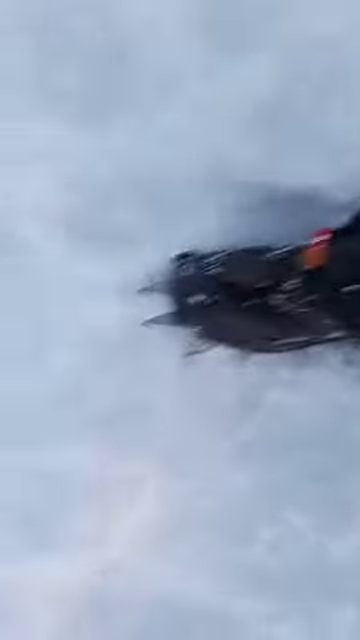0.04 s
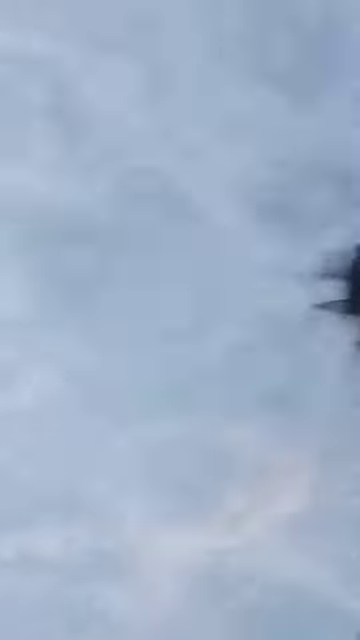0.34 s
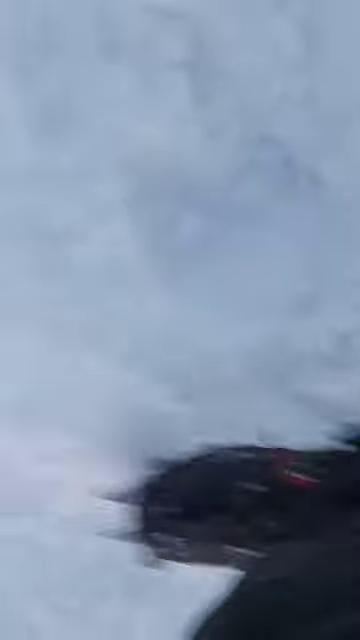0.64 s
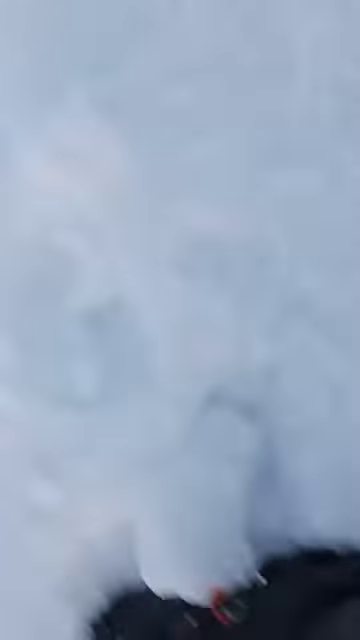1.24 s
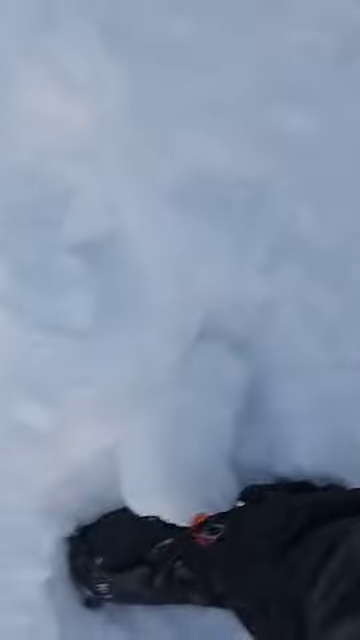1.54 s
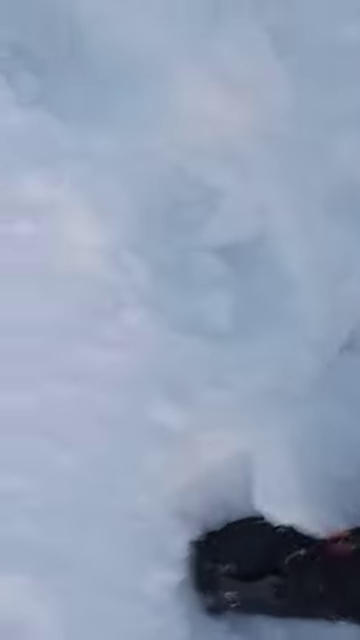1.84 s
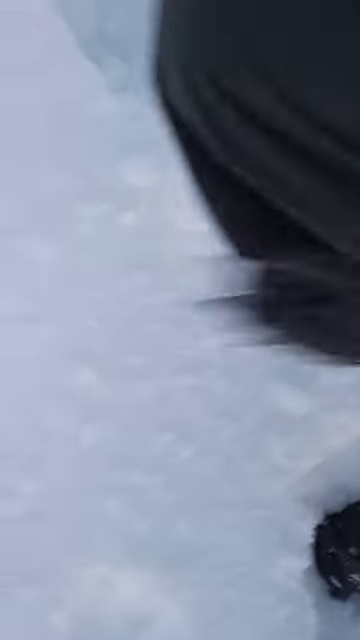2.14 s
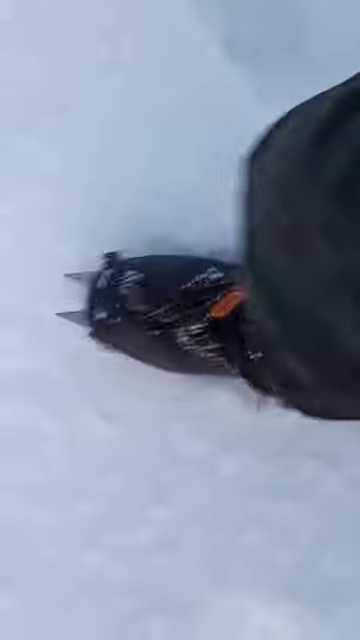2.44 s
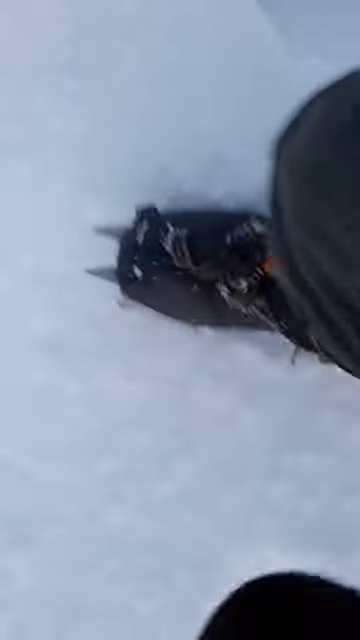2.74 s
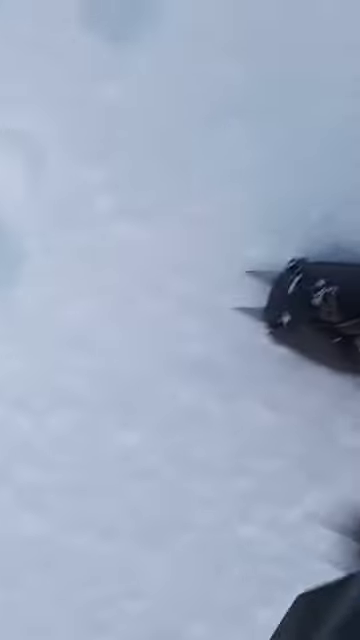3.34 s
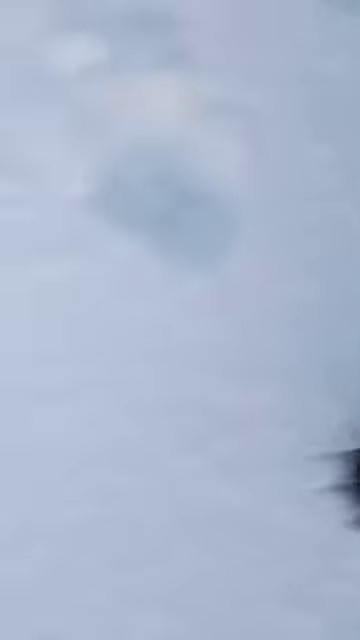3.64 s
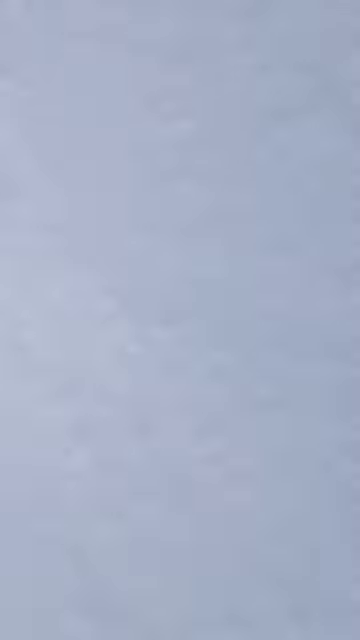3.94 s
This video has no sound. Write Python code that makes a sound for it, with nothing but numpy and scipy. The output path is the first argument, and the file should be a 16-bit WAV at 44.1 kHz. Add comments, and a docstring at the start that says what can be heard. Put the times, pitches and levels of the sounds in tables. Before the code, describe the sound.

Crampon boots crunch across hard snow as wind buffets the microphone.

```python
"""Crampon steps on hard, crusted snow, heard from above the boots, with no echo.
Spikes crack the crust and ring the steel frame; the sole packs the snow, which gives in jerks
that shake the boot. Ice chips tick on the steel; points and trouser legs brush between steps.
Gusts buffet each of two microphone ports separately, over an air hush with one faint whistle."""
import sys
import numpy as np
from scipy import signal
from scipy.fft import rfft, irfft
from scipy.io import wavfile
from scipy.ndimage import uniform_filter1d

SR = 44100
rng = np.random.default_rng(int(sys.argv[2]) if len(sys.argv) > 2 else 0)


def to_wav(s):
    """Save 16-bit WAV."""
    ch = np.atleast_2d(s).T  # columns
    pcm = np.round(np.clip(ch, -1, 1) * 32767)  # PCM
    wavfile.write(sys.argv[1], SR, pcm.astype(np.int16))


N = 176400
TIME_S = np.arange(N) / SR
FREQ_HZ = np.maximum(np.arange(N // 2 + 1) * SR / N, 1)
STEP_LEFT_DB = 0.5  # boots land slightly left

# Snow giving way (time [s], hold [s], crust gain [dB], packing gain [dB])
CRUNCHES = [(0.939, 0.039, -34, -38), (0.996, 0.0096, -39, -24), (1.019, 0.018, -39.5, -32.5),
            (2.362, 0.0089, -25.5, -37), (2.377, 0.012, -29, -22), (2.392, 0.0068, -24, -23),
            (2.458, 0.012, -40, -41.5), (2.479, 0.086, -47.5, -45), (2.525, 0.025, -44.5, -38),
            (2.582, 0.011, -37.5, -30.5), (3.023, 0.066, -49, -39.5), (3.563, 0.0064, -25, -24.5),
            (3.576, 0.024, -30.5, -24), (3.607, 0.034, -42, -41), (3.647, 0.029, -39, -32.5),
            (3.698, 0.021, -41, -36.5)]
# Cracking crust (frequency [Hz], relative density [dB])
CRUST_SPECTRUM = [(500, -4), (1500, -3.5), (2600, -7), (3500, -8), (4500, -3.5), (6000, -2.5), (7500, -1),
                  (10300, 2), (11800, -7), (15500, -12.5)]
# Packing snow (frequency [Hz], relative density [dB])
PACK_SPECTRUM = [(70, -21), (200, 7.5), (480, 0.5), (700, -8), (1170, -7), (1900, -20), (3500, -27),
                 (8000, -48)]
# Crampon frame (frequency [Hz], gain [dB])
STEEL_MODES = [(5466, -6), (6350, -8), (7222, -1), (7820, 11), (8541, 7), (9413, -12), (10323, -20)]
# Stiff boot at pitch factor 1 (frequency [Hz], gain [dB], T60 [s])
BOOT_MODES = [(481, 3, 0.017), (745, 1, 0.011), (894, 0, 0.011), (1050, -4.5, 0.015), (1325, -4, 0.016),
              (1480, -6.5, 0.011)]
# Sole jolts (time [s], level [dB], pitch factor [ratio])
KNOCKS = [(0.996, -25.5, 1.35), (1.017, -34, 1.6), (1.177, -35.5, 1.6), (1.249, -31.5, 1.6),
          (2.3913, -10.5, 1.03), (3.0432, -31, 1), (3.577, -29, 0.98), (3.588, -23.5, 1),
          (3.611, -30, 1.03), (3.652, -27, 1.25)]
# Ice chips on steel (time [s], level [dB])
TICKS = [(0.06, -32), (0.071, -30.5), (.694, -28.5), (1.125, -30), (1.536, -37), (1.644, -40.5),
         (1.846, -45), (2.539, -32), (2.591, -28.5), (2.861, -34.5), (3.043, -41), (3.0721, -19)]
# Chip snap (frequency [Hz], relative density [dB])
TICK_SPECTRUM = [(1200, -8), (4000, -3.5), (9500, 6.5), (13000, -6.5)]
# Trouser legs and loose snow (time [s], gain [dB])
SWISH_CURVE = [(0, -51), (.22, -52), (.42, -68), (.61, -66), (.63, -48), (.80, -47), (.925, -52.5),
               (.95, -35), (1.25, -42), (1.35, -53.5), (1.5, -60), (1.92, -58.5), (2.08, -69),
               (2.35, -57.5), (2.48, -43), (2.63, -64), (2.77, -58), (3.07, -46), (3.16, -52.5),
               (3.33, -73), (3.48, -52.5), (3.55, -67.5), (3.85, -51.5), (4, -54.5)]
# Leg swish (frequency [Hz], relative density [dB])
SWISH_SPECTRUM = [(150, 16.5), (500, 8.5), (1100, -1), (1800, 0), (2800, -4), (4200, -1.5), (7000, -1.5),
                  (10200, 0), (12000, -6.5), (15500, -13)]
# Points and gaiters on snow (time [s], hold [s], gain [dB])
SCUFFS = [(.001, 0.015, -37.5), (0.067, 0.05, -43.5), (0.356, 0.021, -43.5), (0.464, 0.023, -47),
          (0.621, 0.021, -43.5), (0.753, 0.017, -46), (0.903, 0.0044, -41.5), (1.538, 0.1, -54),
          (1.73, 0.015, -58), (2.195, 0.019, -56), (2.229, 0.01, -49), (3.452, 0.0064, -44.5)]
# Gusts on each port (time [s], gain [dB])
GUSTS_LEFT = [(0.0, -10), (0.04, -11.5), (0.08, -39.5), (0.15, -16.5), (0.45, -15), (0.52, -37),
              (0.55, -21.5), (0.65, -29), (0.7, -16.5), (0.8, -44.5), (1.03, -26), (1.27, -33),
              (1.55, -30.5), (1.625, -15.5), (1.67, -43), (1.85, -41), (1.96, -30), (2.02, -81),
              (2.06, -29), (2.44, -39.5), (2.48, -22.5), (2.51, -51), (2.67, -33.5), (2.83, -51),
              (2.93, -67), (2.95, -26), (2.98, -19.5), (3.01, -28.5), (3.09, -17), (3.18, -38), (3.23, -17),
              (3.32, -35), (3.64, -30), (3.75, -51.5), (3.77, -27.5), (3.86, -23), (4.0, -53.5)]
GUSTS_RIGHT = [(0.0, -24.5), (0.31, -11), (0.6, -32), (0.66, -14), (0.7, -24), (0.91, -18.5), (1.03, -29),
               (1.12, -20), (1.28, -39), (1.35, -23), (1.45, -31.5), (1.63, -40), (1.67, -18), (1.73, -34),
               (1.83, -22.5), (2.03, -47), (2.11, -49), (2.16, -26), (2.27, -37.5), (2.31, -30),
               (2.48, -40.5), (2.67, -32), (2.84, -32.5), (2.88, -65), (2.98, -50), (3.03, -22.5),
               (3.09, -57), (3.12, -24), (3.21, -39), (3.27, -22), (3.37, -53.5), (3.53, -45), (3.56, -31),
               (3.76, -68), (3.94, -37.5), (4.0, -63)]
# Rumble of a moderate gust (frequency [Hz], relative density [dB])
WIND_SPECTRUM = [(25, -30), (45, -21), (75, -1.5), (105, 1.5), (200, -6), (330, -16.5), (550, -31),
                 (1000, -56), (2500, -80), (8000, -110)]
# Eddies hitting a port (time [s], peak [dB], pitch [Hz], left minus right [dB])
EDDIES = [(0.152, -5, 288, 14), (.212, -4.5, 274, 32), (.287, -4.5, 190, -23), (.316, -17, 534, -30),
          (.331, -15.5, 420, -32), (0.384, -9, 275, -20), (.77, -11.5, 227, -27), (.866, -13, 222, -26),
          (1.662, -17, 284, -33), (1.81, -23.5, 285, -34)]
# Still air (frequency [Hz], relative density [dB])
AIR_SPECTRUM = [(30, 14), (110, 20), (450, 10.5), (900, 0.5), (2500, -7.5), (7000, -7.5), (15500, -18)]
# Whistle in a lull (time [s], pitch [Hz], level [dB])
WHISTLE_CURVE = [(1.85, 430, -81), (2.04, 490, -62.5), (2.25, 463, -88)]


def steps(crust_db=-2, pack_db=-5.5, body_db=-26, attack_s=0.0059, pack_width=0.52, surge_share=0.27):
    """Crust cracks in jerks that shake the boot, over the duller crunch of packing snow."""
    jerks = slips()
    surge_release_s = 0.0017
    surge = unit_rms(signal.lfilter([1], [1, -np.exp(-1 / (surge_release_s * SR))], jerks))
    crust = crumble(colour(at_ports(grains(per_s=6700, spread_db=0)), CRUST_SPECTRUM))
    crust *= unit_rms(1 - surge_share + surge_share * surge)
    mid = grains(per_s=900, spread_db=4.5)
    side = pack_width * grains(per_s=900, spread_db=4.5)
    pack = colour(np.array([mid + side, mid - side]), PACK_SPECTRUM)
    crust_env, pack_env, body = 0, 0, 0
    for start_s, hold_s, crack_db, load_db in CRUNCHES:
        crust_env += from_db(crust_db + crack_db) * burst(start_s, hold_s, attack_s, release_s=0.0065)
        load = from_db(load_db) * burst(start_s, hold_s, attack_s, release_s=0.0055)
        pack_env += load
        body += boot(jerks * load, pitch=1 + 0.092 * rng.standard_normal())
    crackle = pan(STEP_LEFT_DB) * crust * crust_env
    return crackle + steel(crackle) + from_db(pack_db) * pack * pack_env + from_db(body_db) * body


def slips(per_s=250):
    """Snow collapses in an uneven run of jerks; unit RMS."""
    gaps, sizes = rng.uniform(0.35, 1.65, (2, 3000))
    onsets = (np.cumsum(gaps) * SR / per_s).astype(int)
    clicks = np.zeros(N)
    clicks[onsets[onsets < N]] = sizes[onsets < N]
    return unit_rms(clicks)


def grains(per_s, spread_db):
    """Tiny fractures at random times; unit RMS."""
    sizes = from_db(spread_db * np.minimum(rng.exponential(1, N), 5)) * rng.choice([-1, 1], N)
    return unit_rms(sizes * (rng.random(N) < per_s / SR))


def crumble(stream, depth_db=2.5):
    """Chips of changing size: each third-octave swells and fades on its own; unit RMS."""
    spectrum = rfft(stream)
    thirds = np.clip(3 * np.log2(FREQ_HZ / 500), 0, 14)
    bands = (band(spectrum, thirds, k) * from_db(depth_db * drift(corner_hz=29)) for k in range(15))
    return unit_rms(sum(bands))


def steel(drive, t60_s=0.05, gain_db=-14):
    """The crampon frame rings with what breaks on it."""
    modes = sum(from_db(db) * ring(drive, hz, t60_s) for hz, db in STEEL_MODES)
    decay_norm = np.sqrt(2 * np.log(1000) / (t60_s * SR))
    return from_db(gain_db) * decay_norm * modes / len(STEEL_MODES)


def boot(drive, pitch):
    """Hollow boot modes of alternating sign; higher pitch dies sooner."""
    return sum((-1) ** k * from_db(db) * ring(drive, hz * pitch, t60_s / pitch)
               for k, (hz, db, t60_s) in enumerate(BOOT_MODES))


def knocks():
    """Collapsing snow jolts the sole; each impulse rings the boot."""
    return sum(boot(from_db(db) * (np.arange(N) == int(start_s * SR)), pitch)
               for start_s, db, pitch in KNOCKS)


def ticks():
    """Ice chips snap on the frame and ring it."""
    envelope = sum(from_db(db) * burst(start_s, hold_s=0.00019, attack_s=0.0001, release_s=0.0011)
                   for start_s, db in TICKS)
    snaps = envelope * colour(rng.standard_normal((2, N)), TICK_SPECTRUM) * pan(STEP_LEFT_DB)
    return snaps + steel(snaps)


def swish(gain_db=1):
    """Swinging legs rub cloth and loose snow: dense friction grains."""
    friction = crumble(at_ports(grains(per_s=16000, spread_db=3)))
    envelope = from_db(gain_db + in_time(SWISH_CURVE)[0])
    return colour(friction, SWISH_SPECTRUM) * envelope * pan(STEP_LEFT_DB)


def scuffs(gain_db=0.5):
    """Points and gaiters skim the crust: short bursts of friction grains."""
    envelope = sum(from_db(gain_db + db) * burst(start_s, hold_s, attack_s=0.0067, release_s=0.0096)
                   for start_s, hold_s, db in SCUFFS)
    return envelope * colour(at_ports(grains(per_s=16000, spread_db=3)), CRUST_SPECTRUM)


def port_wind(gusts, gain_db=-0.5, flutter_db=4.5, moderate_db=-19.5, bright_from_hz=190):
    """Fluttering turbulence on one port; stronger gusts are brighter."""
    gust_db = in_time(gusts)[0] + flutter_db * drift(corner_hz=29.6)
    noise = colour(rng.standard_normal(N), WIND_SPECTRUM)
    swell = np.sqrt(uniform_filter1d(np.abs(signal.hilbert(noise)) ** 2 / 2, size=1500))
    spectrum = rfft(unit_rms(noise / uniform_filter1d(swell, size=600)))  # noise's own swell removed
    octaves = np.clip(np.log2(FREQ_HZ / bright_from_hz), 0, 4)
    tilt_db_per_octave = 0.45 * np.maximum(gust_db - moderate_db, -10)
    return sum(band(spectrum, octaves, k) * from_db(gain_db + gust_db + k * tilt_db_per_octave)
               for k in range(5))


def eddies():
    """Each eddy is a pointed pressure bump between two shallow dips."""
    out = np.zeros((2, N))
    for centre_s, db, hz, left_db in EDDIES:
        phase_sq = (np.pi * hz * (TIME_S - centre_s)) ** 2
        bump = (1 - 3 * phase_sq) / (1 + phase_sq) ** 3
        out += pan(left_db) / np.sqrt(2) * from_db(db) * bump
    return out


def whistle(waver_share=0.012):
    """One faint, wavering tone in a lull."""
    hz, db = in_time(WHISTLE_CURVE)
    phase = 2 * np.pi * np.cumsum(hz * (1 + waver_share * drift(corner_hz=30))) / SR
    gate = (TIME_S > WHISTLE_CURVE[0][0]) & (TIME_S < WHISTLE_CURVE[-1][0])
    return np.sqrt(2) * from_db(db) * np.sin(phase) * gate


def air(level_db=-57.5):
    """Steady open-air hush, independent at each port."""
    return from_db(level_db) * colour(rng.standard_normal((2, N)), AIR_SPECTRUM)


def at_ports(clicks, alike_below_hz=1370):
    """Grains reach both ports: alike in the bass, scattered in the treble."""
    side_gain = np.sqrt(1 / (1 + (alike_below_hz / FREQ_HZ) ** 4))
    side = irfft(rfft(clicks * rng.choice([-1, 1], N)) * side_gain, N)
    mid = irfft(rfft(clicks) * np.sqrt(2 - side_gain ** 2), N)
    return np.array([mid + side, mid - side])


def ring(drive, hz, t60_s):
    """One mode: a unit click leaves a decaying unit sine."""
    radius, angle = from_db(-60 / (t60_s * SR)), 2 * np.pi * hz / SR
    return signal.lfilter([0, np.sin(angle)], [1, -2 * radius * np.cos(angle), radius ** 2], drive + 1e-18)


def burst(start_s, hold_s, attack_s, release_s):
    """Linear rise ending at start_s, hold, exponential fall."""
    rise = np.clip((TIME_S - start_s) / attack_s + 1, 0, 1)
    return rise * np.exp(-np.clip((TIME_S - start_s - hold_s) / release_s, 0, 20))


def colour(stream, spectrum):
    """Shape by a spectrum on a log-frequency axis; unit RMS."""
    hz, db = np.transpose(spectrum)
    gain = from_db(np.interp(np.log(FREQ_HZ), np.log(hz), db))
    return unit_rms(irfft(rfft(stream) * gain, N))


def band(spectrum, axis, centre):
    """Signal in one triangular band."""
    return irfft(spectrum * np.maximum(1 - np.abs(axis - centre), 0), N)


def drift(corner_hz):
    """Low-passed noise; unit RMS."""
    return unit_rms(irfft(rfft(rng.standard_normal(N)) / (1 + (FREQ_HZ / corner_hz) ** 2), N))


def in_time(curve):
    """Curve columns, interpolated per sample."""
    times_s, *columns = np.transpose(curve)
    return [np.interp(TIME_S, times_s, column) for column in columns]


def pan(left_db):
    """Constant-power left and right gains."""
    return unit_rms(from_db([[left_db / 2], [-left_db / 2]]))


def from_db(db):
    return 10 ** (np.asarray(db) / 20)


def unit_rms(x):
    return x / np.sqrt(np.mean(x ** 2) + 1e-20)


def scene(wind_low_cut_hz=45):
    """Boots on open snow, wind on the ports; stereo."""
    wind = np.array([port_wind(GUSTS_LEFT), port_wind(GUSTS_RIGHT)]) + eddies()
    wind = signal.sosfilt(signal.butter(3, wind_low_cut_hz, "high", fs=SR, output="sos"), wind)
    return steps() + knocks() + ticks() + swish() + scuffs() + wind + whistle() + air()


def record(dry):
    """Soft clip, then steep low-pass."""
    cutoff_hz = 15500
    rounded = dry / (1 + dry ** 6) ** (1 / 6)
    return signal.sosfilt(signal.ellip(10, 0.2, 80, cutoff_hz, fs=SR, output="sos"), rounded)


dry = scene()
out = record(dry)
to_wav(out)
```